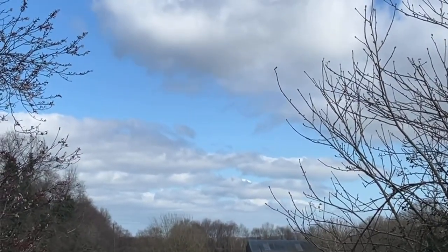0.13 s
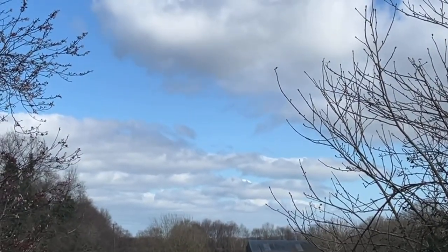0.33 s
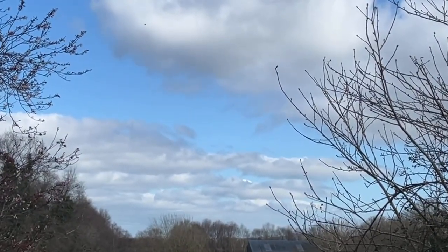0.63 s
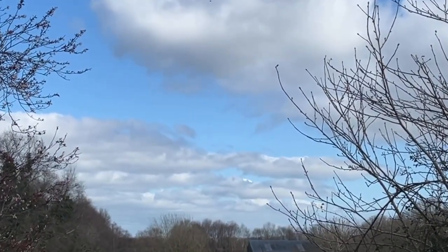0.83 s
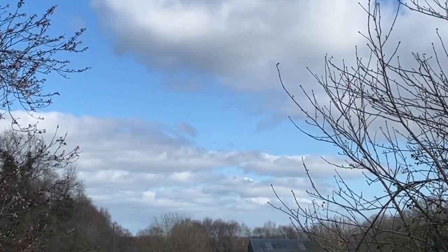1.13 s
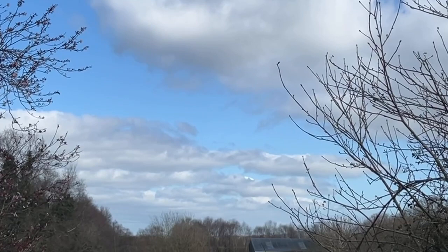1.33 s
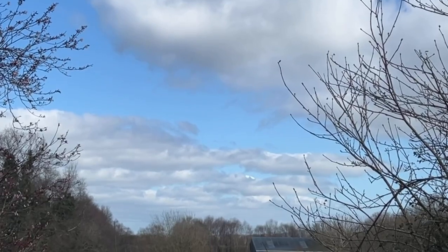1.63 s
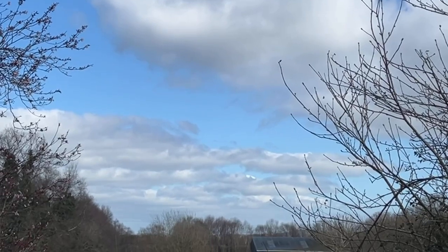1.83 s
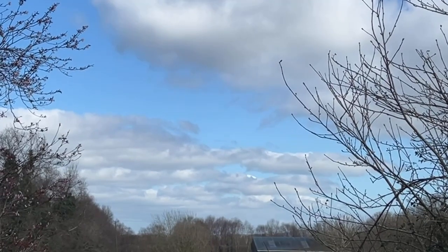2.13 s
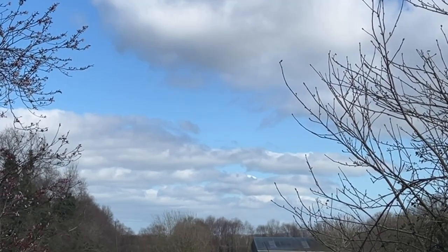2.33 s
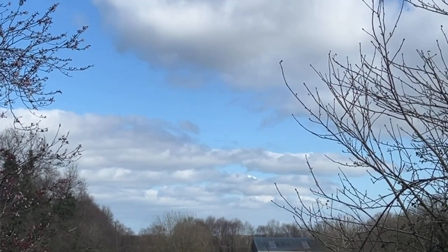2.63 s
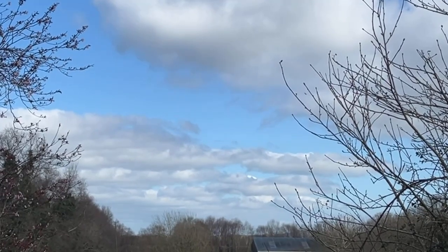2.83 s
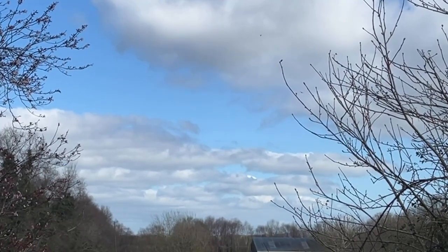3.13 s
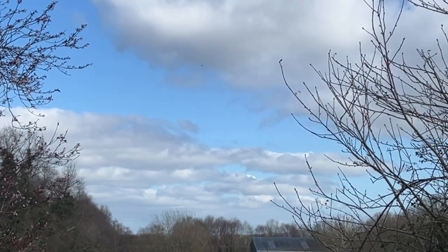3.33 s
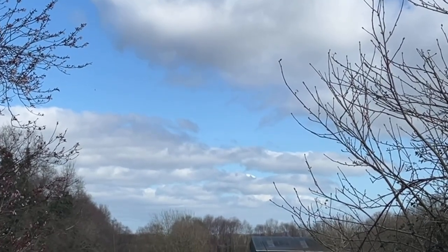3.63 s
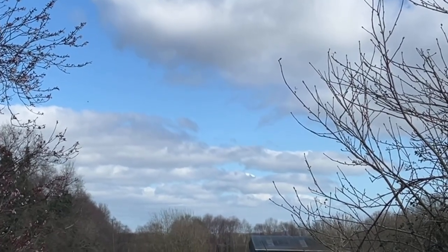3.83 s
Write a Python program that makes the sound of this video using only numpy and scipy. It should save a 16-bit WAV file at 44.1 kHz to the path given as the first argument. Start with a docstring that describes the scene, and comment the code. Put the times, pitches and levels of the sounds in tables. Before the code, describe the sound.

Birds of prey mew high overhead while songbirds warble and a thrush flutes loudly in light wind.

```python
"""A quick warbler and faint far whistles open the scene, then birds of prey mew high over a field.
A loud fluting thrush joins close by; all the birds are sine partials gliding along pitch curves, with echoes.
A hoarse call in the distance is throbbing band noise, and something rustles in grainy hiss and dry ticks.
Wind thumps the microphone as lumpy low noise, over swelling bands of air and a haze of far birdsong."""
import sys
import numpy as np
from scipy import signal
from scipy.fft import rfft, irfft
from scipy.io import wavfile
from scipy.ndimage import uniform_filter1d

SR = 44100
rng = np.random.default_rng(int(sys.argv[2]) if len(sys.argv) > 2 else 0)


def generate_wav(signal):
    """Clip the signal to [-1, 1] and save it as 16-bit WAV at the path in sys.argv[1]."""
    frames = np.transpose(np.atleast_2d(signal))
    scaled = np.clip(frames, -1, 1) * 32767
    pcm = np.round(scaled).astype(np.int16)
    wavfile.write(sys.argv[1], SR, pcm)


N = 176400  # samples, 4 s

# Three mews as contours: time_s, second_partial_hz, second_partial_level_db
FIRST_MEW = [(.655, 1970, -43.5), (.685, 2550, -57.5), (.75, 2883, -55), (.825, 2630, -56.5),
             (.866, 2858, -54.5), (.93, 2633, -56), (.99, 2572, -58.5), (1.005, 2410, -55.5),
             (1.15, 2284, -52), (1.27, 1889, -66), (1.335, 1560, -78)]
SECOND_MEW = [(2.315, 2362, -72.5), (2.391, 2756, -64.5), (2.452, 2580, -68.5), (2.53, 2470, -65),
              (2.601, 2160, -66.5), (2.66, 1760, -68)]
THIRD_MEW = [(3.285, 2123, -71), (3.342, 2818, -59), (3.451, 2744, -53.5), (3.578, 2480, -64),
             (3.629, 2390, -72.5)]
# Mew timbre: multiple of the fundamental, level_db
MEW_PARTIALS = [(1, -10), (2, 0), (3, -13), (4, -31)]
# Other partials brighten by this slope with pitch; their table levels hold at this fundamental
MEW_BRIGHT_DB_PER_OCTAVE, MEW_REFERENCE_HZ = 19.5, 1360

# Warbler glides: start_s, length_s, early_level_db, late_level_db, five evenly spaced pitches_hz
WARBLE_NOTES = [(0.03, 0.052, -57, -57.5, 4990, 5720.0, 5750, 5300, 3950),
                (0.38, 0.032, -53, -49.5, 4240, 3570, 3500, 3640, 5450),
                (0.452, 0.046, -49.5, -54, 4045, 3716, 3590, 3270, 2700),
                (0.578, 0.051, -50.5, -50.5, 4670, 3580, 3660, 3130, 3160),
                (0.74, 0.11, -52, -49.5, 3710, 3740, 3610, 3790, 3800),
                (1.53, 0.07, -53.5, -51, 4080, 4270, 3730.0, 3320, 3020),
                (1.6, 0.065, -49, -48, 3090, 3720.0, 4040, 4230, 4680),
                (1.845, 0.049, -67, -52.5, 5380, 5430.0, 5190.0, 5000, 4470),
                (2.025, 0.069, -47.5, -53, 4200, 3890.0, 3410, 3054, 3000),
                (2.095, 0.041, -52.5, -52, 3090, 3590, 3960, 4050, 4000),
                (2.32, 0.067, -78, -62, 5190, 5460, 5240, 5160.0, 4520),
                (2.51, 0.067, -53.5, -58.5, 4330, 4335, 3490, 3030, 2980),
                (2.575, 0.048, -61.5, -57, 2920, 3330, 3840, 4140, 4270),
                (2.782, 0.073, -48.5, -48.5, 3860, 3778, 3614, 3617, 2580),
                (3.132, 0.04, -43.5, -46, 4150, 4286, 3915, 3720, 3900),
                (3.232, 0.05, -45.4, -43, 3650, 3290, 3210, 2775, 2660),
                (3.845, 0.085, -67, -74, 8700, 7400, 5840, 4850, 4270),
                (3.9, 0.072, -51, -58, 6200, 6970, 5420, 5220, 5350)]
# Notes sung with a rasp: start_s, length_s, early_level_db, late_level_db, five pitches_hz
RASPING_NOTES = [(0.088, 0.12, -53, -61.5, 3864, 3984, 3923, 4140, 3790),
                 (3.355, 0.065, -51, -40, 4900, 3900.0, 3424, 3110, 3000)]
# Short chips: start_s, length_s, level_db, start_hz, middle_hz, end_hz
CHIPS = [(0.0, 0.029, -59, 3780, 3880, 4230), (0.07, 0.019, -52, 4810, 4930, 5020),
         (0.36, 0.026, -57.5, 4150, 3630, 3640), (1.458, 0.017, -62.5, 3280, 4120, 4300),
         (1.485, 0.023, -58, 3600, 4136, 4150), (1.516, 0.0099, -54, 4160, 3600, 3250),
         (1.73, 0.013, -48, 4020, 4400, 4000), (1.752, 0.018, -47.5, 3160, 4020, 4320),
         (1.783, 0.021, -51, 4950, 4630, 4700), (1.948, 0.016, -53, 3670, 4450, 4330),
         (1.973, 0.018, -46.5, 3310, 4120, 3800), (2.003, 0.016, -61, 4470, 4210, 3900),
         (2.014, 0.013, -53, 2900, 3600, 4330), (2.207, 0.011, -61, 4320, 4800, 4790.0),
         (2.222, 0.016, -53, 3690, 4510, 4330), (2.253, 0.022, -50.5, 5140, 4235, 4410),
         (2.44, 0.021, -58.5, 4110, 3750, 3340), (2.457, 0.026, -55, 3450, 4300, 4280),
         (2.487, 0.021, -57.5, 3830, 3460, 4300), (2.715, 0.022, -71, 5500, 6270, 6400),
         (3.108, 0.029, -59, 3480.0, 3020, 2780), (3.11, 0.055, -68.5, 6520, 5560, 4250),
         (3.17, 0.02, -62.5, 5180, 5080, 4220.0), (3.228, 0.032, -49, 4680, 3870.0, 2984),
         (2.74, 0.036, -57.5, 3684, 3590, 3700), (3.87, 0.034, -56.5, 8440, 7400, 7300),
         (1.3, 0.052, -80, 7720, 7600, 6300)]
# Faint far whistles: start_s, length_s, level_db, start_hz, middle_hz, end_hz
FAR_WHISTLES = [(0.065, 0.062, -66, 2406, 2170, 2010), (0.5, 0.093, -67, 2190, 2230, 2040),
                (1.275, 0.087, -64.5, 2706, 2370, 1890), (1.74, .16, -73, 2235, 2232, 2210),
                (2.244, .21, -71.5, 2022, 1975, 1963), (1.955, 0.145, -67, 2184, 2207, 2020),
                (3.53, 0.22, -59, 2915, 2890, 2970)]
SONG_TRIM_DB = -0.5  # on all four tables above
RASP_DB, GRAIN_DB = 4.2, 1.3  # depth of the fast roughness: rasping notes, ordinary notes
ROUGH_BEND = 0.0043  # share of pitch per dB of roughness
# Buzzing trill contour: time_s, lowest_hz (before BUZZ_TUNING), half_upward_flick_hz (likewise), level_db
BUZZ = [(.845, 3727, 144.6, -55), (0.941, 3860, 292, -52), (0.956, 3774, 546, -54),
        (1.016, 3870, 577, -56.5), (1.027, 4100, 500, -74)]
BUZZ_PER_S, BUZZ_TUNING = 165, 0.98  # mean flick rate, pitch multiple

# Plain thrush notes: start_s, length_s, early_level_db, late_level_db, five pitches_hz
FLUTE_NOTES = [(2.701, 0.18, -63.5, -55, 1336, 1430, 1530, 1640, 1695),
               (2.9, 0.1016, -44, -42, 1730, 1770, 1786, 1819, 1770),
               (3.488, 0.267, -51.5, -55, 3450, 3180, 3270, 3310, 3340),
               (3.478, 0.1212, -42.5, -39.5, 1844, 2010, 1926, 1866, 1790),
               (3.639, 0.18, -38, -41, 2368, 2347, 2298, 2281, 2158)]
# Trilled thrush notes: start_s, length_s, early_level_db, late_level_db, five pitches_hz,
# trill_start (share of note), trill_depth (0-1)
TRILLED_NOTES = [(3.042, 0.24, -40.5, -39, 2436, 2236, 2187, 1986, 1967, .43, 0.36),
                 (3.342, .135, -41, -37.5, 2108, 2450, 2492, 2485, 2254, 0.0039, 0.8)]
# Thrush timbre: multiple of the pitch, level_db
FLUTE_PARTIALS = [(1, 0), (3, -47), (5, -45)]
TRILL_PER_S, TRILL_SWING = 65, .09  # mean rate, share of pitch at full depth
TRILL_RASP_DB, OVERTONE_BLUR_DB = 4, 4.5
FLUTE_EDGE_HZ = 10000  # partials above this fade by 12 dB per kHz
NOTE_EDGE_S, WAVER_DB = 0.0053, 1.5  # short-note fade, level waver of every whistle

# Hoarse calls: middle_s, length_s, centre_hz, level_db
HOARSE_CALLS = [(0.503, 0.093, 975, -60.5), (1.039, 0.33, 976, -61.5), (1.598, 0.26, 815, -63),
                (2.53, 0.23, 977, -59.5), (3.016, 0.24, 1145, -63.5), (3.659, 0.21, 1010, -56.5),
                (3.79, 0.14, 790, -59.5)]
HOARSE_WIDTH_HZ, HOARSE_THROB_HZ = 325, 61  # band width, upper rate of the throb

# Rustling swells: middle_s, length_s, level_db before the grain
RUSTLES = [(1.26, 0.14, -80.5), (1.385, .1, -81.5), (1.49, 0.1, -81), (1.66, 0.14, -74.5),
           (1.875, .11, -73), (2.19, 0.057, -73), (2.45, 0.2, -75), (2.82, 0.2, -82), (3.92, 0.28, -83.5)]
# Rustle spectrum: frequency_hz, relative_level_db
RUSTLE_SHAPE = [(6000, 4.5), (10500, 3.5), (12200, -8), (14200, 1.5), (15600, -12)]
# Dry ticks: start_s, level_db of the white noise before differencing
TICKS = [(0.2738, -67), (0.859, -69), (1.2685, -70), (1.39, -71), (1.497, -67)]

# Wind contour: time_s, rumble_level_db before the gust wander
WIND_LEVELS = [(0, -64.5), (.25, -81.5), (0.501, -56.5), (0.748, -53.5), (1.151, -58.5), (1.3, -73.5),
               (1.75, -64), (2.0, -72.5), (2.2, -57), (2.4, -81.5), (2.75, -66), (3.001, -79), (3.202, -65),
               (3.401, -70.5), (3.51, -54.5), (3.72, -42.5), (4, -55)]
# Rumble spectrum: frequency_hz, relative_level_db
WIND_SHAPE = [(28, -31.5), (45, -5), (72, 1), (125, -6), (160, -19), (300, -37)]
# Higher flutter in strong gusts: centre_hz, width_hz, rumble_db at which it lies 20 dB under the rumble
FLUTTER = (117, 122, -67.5)
GUST_DB = 4

# Air spectrum: frequency_hz, relative_level_db
AIR_SHAPE = [(150, -10.5), (454, -2), (767, -9.5), (1990, -1.5), (4000, -10.5), (5800, -20), (11000, -27.5),
             (15600, -37.5)]
# Air contours before the wander: time_s, low_band_level_db, middle_band_level_db
AIR_LEVELS = [(0, -69.5, -66), (0.519, -71, -63.5), (.62, -74.5, -73.5), (1.301, -66.5, -68.5),
              (2.3, -68.5, -77.5), (2.6, -78.5, -74.5), (3.3, -73, -69), (3.701, -66.5, -58)]
TREBLE_DB = -72.5  # high band, before the wander
# Haze of far birdsong: centre_hz, width_hz, level_db before the wander
FAR_CHORUS = [(2230, 570, -75), (3610, 770, -71.5)]
# Treble hiss swells: middle_s, length_s, level_db
HISS_SWELLS = [(2.5, 5.5, -84), (3.44, 0.18, -75.5), (3.62, 0.16, -72.5)]
HISS_HZ, HISS_WIDTH_HZ = 6500, 3500

QUICK_T60_S, QUICK_DB, SLOW_T60_S, SLOW_DB = 0.41, -9, 2.2, -15  # tail levels against the dry birds
EDGE_HZ = 15750


def amp(db):
    """Decibels to linear gain."""
    return 10 ** (np.asarray(db) / 20)


def evened(x):
    """Scale to an RMS of one."""
    return x / np.sqrt(np.mean(x ** 2) + 1e-20)


def read(points, hz):
    """Read a spectrum table along a log frequency axis."""
    f, value = np.transpose(points)
    return np.interp(np.log(hz + 1), np.log(f + 1), value)


def add(mix, s, sound):
    """Lay a sound into the mix at s seconds, cut at the end."""
    part = mix[round(s * SR):][:len(sound)]
    part += sound[:len(part)]


def drift(hz, count=N):
    """Random wander up to about hz, with an RMS of one."""
    size = max(int(SR / hz / 2), 2)
    once = uniform_filter1d(rng.standard_normal(count), size)
    return evened(uniform_filter1d(once, size))


def shaped(db_of_hz):
    """Noise with a fixed spectrum and an RMS of one."""
    spectrum = rfft(rng.standard_normal(N))
    gain = amp(db_of_hz(np.fft.rfftfreq(N, 1 / SR)))
    return evened(irfft(spectrum * gain, N))


def band(hz, width_hz):
    """Noise in one rounded resonance."""
    return shaped(lambda f: -10 * np.log10(1 + ((f - hz) / width_hz * 2) ** 4))


def bumps(rows):
    """Half-cosine swells around given middles."""
    t = np.arange(N) / SR
    return sum(amp(db) * np.cos(np.pi * np.clip((t - s) / length, -.5, .5)) for s, length, db in rows)


def whistle(hz, db, partials, edge_s):
    """Sine partials on a pitch curve, faded at both ends, wavering in moving air."""
    t = np.arange(len(hz)) / SR
    phase = 2 * np.pi * np.cumsum(hz) / SR
    fade = np.clip(np.minimum(t, t[-1] - t) / edge_s, 0, 1)
    tone = sum(amp(d) * np.sin(k * phase) for k, d in partials)
    level = amp(db + WAVER_DB * drift(43, count=len(hz)))
    return np.sqrt(2) * fade * level * tone  # sqrt(2) makes the levels RMS


def glide(length, early_db, late_db, pitches):
    """Share of the note, smoothed pitch and level along it."""
    u = np.linspace(0, 1, round(length * SR))
    hz = np.interp(u, np.linspace(0, 1, len(pitches)), pitches)
    hz = uniform_filter1d(hz, len(u) // 8, mode="nearest")
    return u, hz, np.interp(u, [.25, .75], [early_db, late_db])


def mews(mix):
    """Drawn-out calls whose second partial carries; brightest at the top of the arch."""
    for mew in (FIRST_MEW, SECOND_MEW, THIRD_MEW):
        s, hz, db = np.transpose(mew)
        t = np.arange(s[0], s[-1], 1 / SR)
        second_hz = uniform_filter1d(np.interp(t, s, hz), 600, mode="nearest")
        fundamental = second_hz / 2
        bright_db = MEW_BRIGHT_DB_PER_OCTAVE * np.log2(fundamental / MEW_REFERENCE_HZ)
        partials = [(k, d + (k != 2) * bright_db) for k, d in MEW_PARTIALS]
        add(mix, s[0], whistle(fundamental, np.interp(t, s, db), partials, 0.027))
    return mix


def song_notes(mix, rows, edge_s, rough_db):
    """Pure glides whose level and pitch are roughened together by a fast wander."""
    for s, length, early_db, late_db, *pitches in rows:
        u, hz, db = glide(length, early_db, late_db, pitches)
        rough = rough_db * drift(300, count=len(u))
        add(mix, s, whistle(hz * (1 + ROUGH_BEND * rough), db + rough, [(1, SONG_TRIM_DB)], edge_s))


def buzzing_trill(mix):
    """One call whose pitch flicks upward fast and softens at each peak."""
    s, hz, swing, db = np.transpose(BUZZ)
    t = np.arange(s[0], s[-1], 1 / SR)
    rate = BUZZ_PER_S * (1 + .25 * drift(57, count=len(t)))
    beat = np.sin(2 * np.pi * np.cumsum(rate) / SR)
    pitch = np.interp(t, s, hz) + (1 + beat) * np.interp(t, s, swing)
    level_db = np.interp(t, s, db) + 2.5 * drift(150, count=len(t))
    tone = whistle(pitch, level_db, [(BUZZ_TUNING, 0.012)], NOTE_EDGE_S)
    add(mix, s[0], (1 - beat / 4) * tone)


def songbirds(mix):
    """Short glides near and far, some rasping, and one fast buzzing trill."""
    chips = [(s, length, db, db, *hz) for s, length, db, *hz in CHIPS]
    far = [(s, length, db, db, *hz) for s, length, db, *hz in FAR_WHISTLES]
    song_notes(mix, WARBLE_NOTES + chips, NOTE_EDGE_S, GRAIN_DB)
    song_notes(mix, far, .015, 0)
    song_notes(mix, RASPING_NOTES, NOTE_EDGE_S, RASP_DB)
    buzzing_trill(mix)
    return mix


def thrush(mix):
    """Loud fluted notes; in a trill pitch and level throb together; the overtones are blurred."""
    plain = [(*row, 0, 0) for row in FLUTE_NOTES]
    for s, length, early_db, late_db, *pitches, start, depth in plain + TRILLED_NOTES:
        u, hz, db = glide(length, early_db, late_db, pitches)
        wander = .5 * drift(60, count=len(u))
        beat = np.cos(2 * np.pi * TRILL_PER_S * (u - start) * length + wander)
        depth = np.clip(depth, 0, 1) * np.clip((u - start) * 20, 0, 1)  # the trill eases in
        partials = []
        for k, d in FLUTE_PARTIALS:
            edge_loss = .012 * np.maximum(k * hz - FLUTE_EDGE_HZ, 0)
            blur = (k > 1) * OVERTONE_BLUR_DB * drift(150, count=len(u))
            partials.append((k, d - edge_loss + blur))
        pitch = hz * (1 - TRILL_SWING * depth * beat)
        level_db = db + TRILL_RASP_DB * depth * drift(300, count=len(u))
        tone = whistle(pitch, level_db, partials, 0.018)
        add(mix, s, tone * (1 - depth * (1 + beat) / 2) ** 1.1)
    return mix


def echoes(x):
    """Trees and hedges scatter back a quick and a slow noise tail, cut at one second."""
    t = np.arange(SR) / SR
    onset = np.clip(t / 0.004 - 1, 0, 1)  # silent for 4 ms, full at 8 ms
    tail = np.zeros(SR)
    for t60, db in ((QUICK_T60_S, QUICK_DB), (SLOW_T60_S, SLOW_DB)):
        tail += amp(db) * evened(rng.standard_normal(SR) * amp(-60 * t / t60) * onset)
    return signal.fftconvolve(x, tail / np.sqrt(SR))[:N]


def hoarse_calls():
    """Unevenly throbbing noise, each call in one resonance, far off."""
    throb = amp(2.75 * drift(HOARSE_THROB_HZ))
    calls = sum(band(hz, HOARSE_WIDTH_HZ) * bumps([(s, length, db)]) for s, length, hz, db in HOARSE_CALLS)
    return throb * calls


def rustle():
    """Grainy hiss in swells, with a few dry ticks of decaying differenced noise."""
    grain = amp(4.5 * drift(700))
    hiss = shaped(lambda f: read(RUSTLE_SHAPE, f) - 60 * (f < 5000))
    out = hiss * grain * bumps(RUSTLES)
    t = np.arange(200) / SR
    for s, db in TICKS:
        add(out, s, amp(db) * np.diff(rng.standard_normal(201)) * np.exp(-t / 0.0034))
    return out


def wind():
    """Lumpy low rumble on the microphone; the flutter grows faster than the rumble."""
    s, db = np.transpose(WIND_LEVELS)
    level = np.interp(np.arange(N) / SR, s, db) + GUST_DB * (drift(12) - .5)
    rumble = shaped(lambda f: read(WIND_SHAPE, f) - 40 * (f > 400)) * amp(level)
    centre_hz, width_hz, reference_db = FLUTTER
    flutter_db = level + .5 * (level - reference_db) - 20
    return rumble + band(centre_hz, width_hz) * amp(flutter_db)


def air():
    """Outdoor noise in three bands that swell apart, under a patchy haze of far birdsong."""
    t = np.arange(N) / SR
    s, low_db, middle_db = np.transpose(AIR_LEVELS)
    treble_db = TREBLE_DB + 0 * s  # steady
    out = np.zeros(N)
    for lo, hi, db in ((140, 620, low_db), (620, 1750, middle_db), (1750, SR, treble_db)):
        part = shaped(lambda f: read(AIR_SHAPE, f) - 80 * ((f < lo) | (f >= hi)))
        out += part * amp(np.interp(t, s, db) + 1.5 * drift(17))
    for hz, width_hz, db in FAR_CHORUS:
        out += band(hz, width_hz) * amp(db + 3.5 * drift(6))
    return out + band(HISS_HZ, HISS_WIDTH_HZ) * bumps(HISS_SWELLS)


def scene():
    """Birds with their echoes, over the dry call, rustle, wind and air."""
    birds = mews(np.zeros(N)) + songbirds(np.zeros(N)) + thrush(np.zeros(N))
    return (birds + echoes(birds) + hoarse_calls() + rustle() + wind() + air())[None]


def record(dry):
    """A steep low-pass limits the band."""
    lowpass = signal.firwin(511, EDGE_HZ, window=("kaiser", 9), fs=SR)
    return signal.oaconvolve(dry, lowpass[None], "same")


dry = scene()
out = record(dry)
generate_wav(out)
```